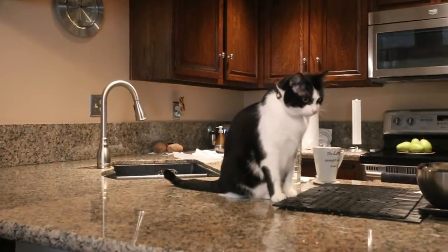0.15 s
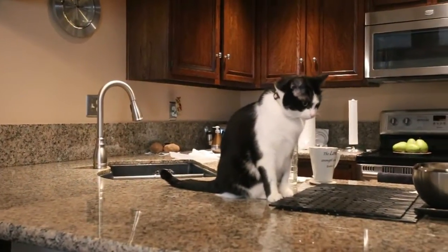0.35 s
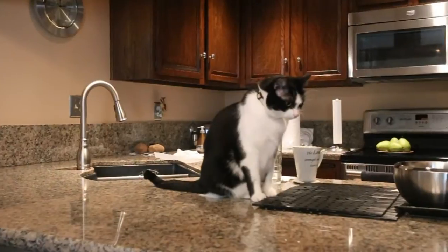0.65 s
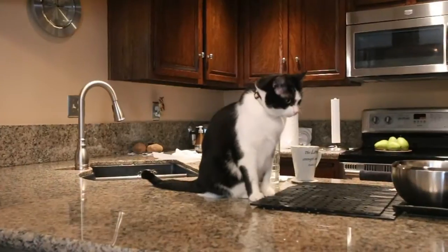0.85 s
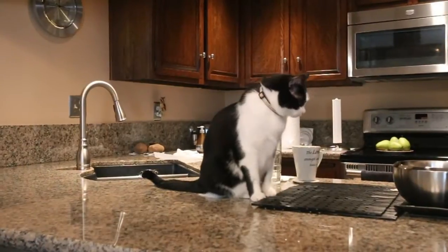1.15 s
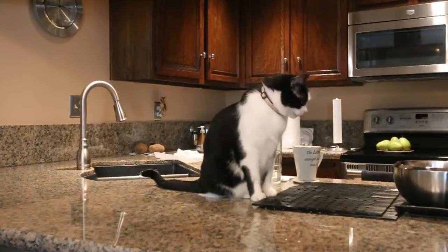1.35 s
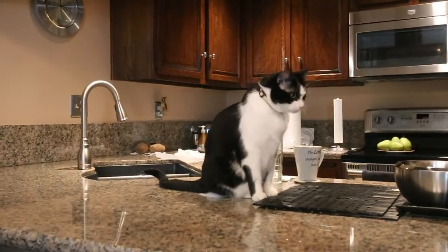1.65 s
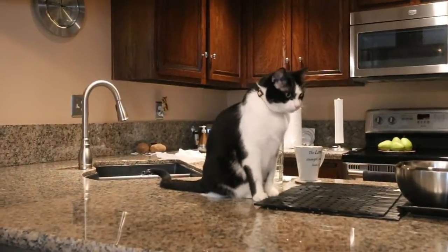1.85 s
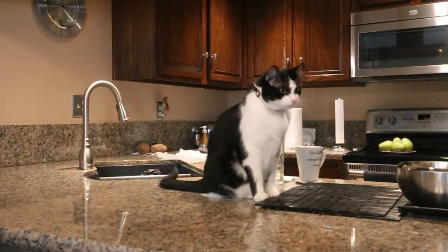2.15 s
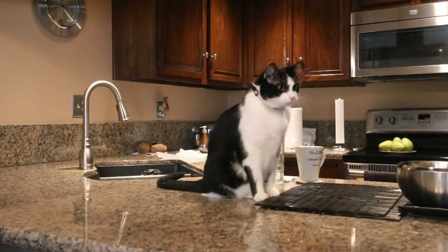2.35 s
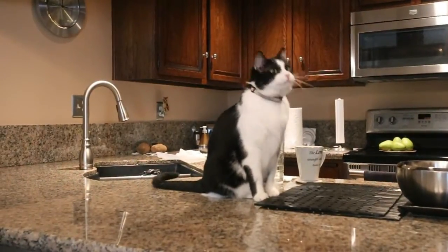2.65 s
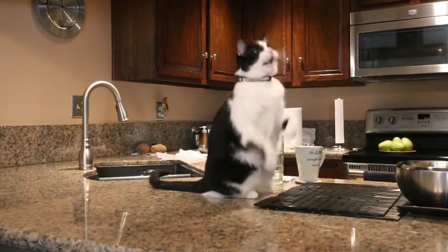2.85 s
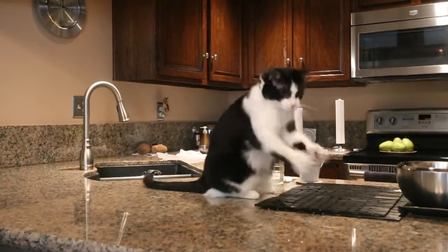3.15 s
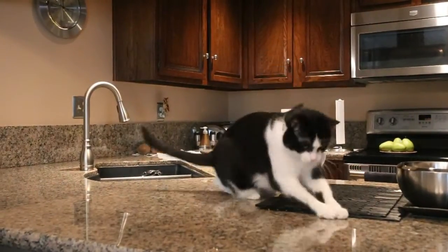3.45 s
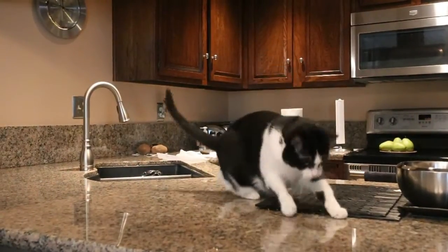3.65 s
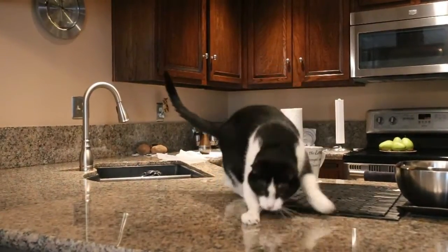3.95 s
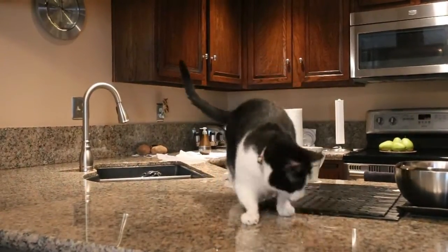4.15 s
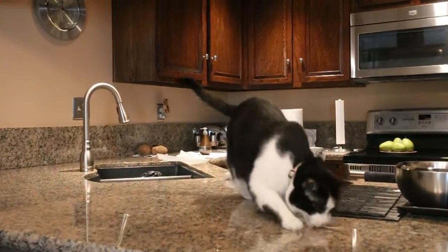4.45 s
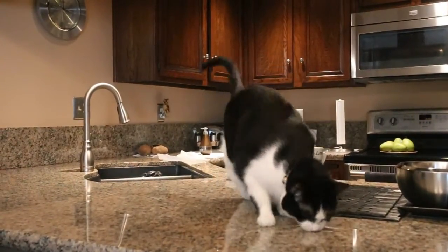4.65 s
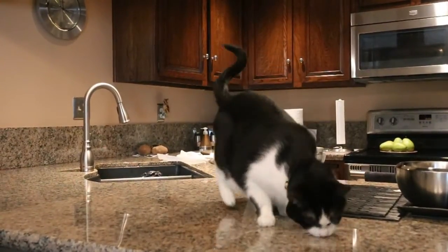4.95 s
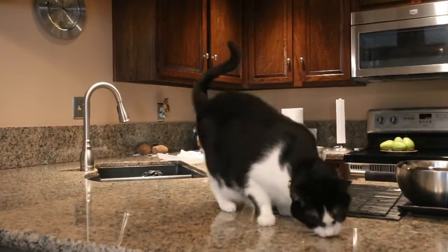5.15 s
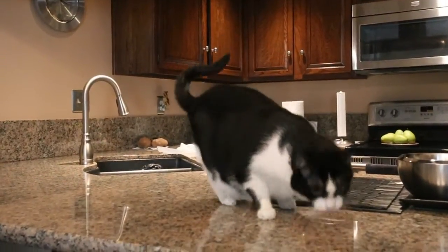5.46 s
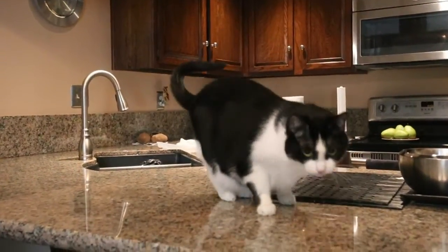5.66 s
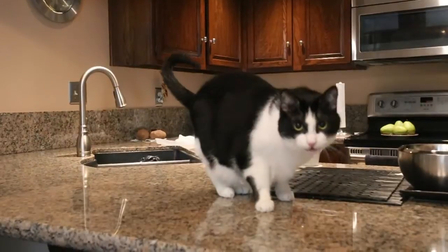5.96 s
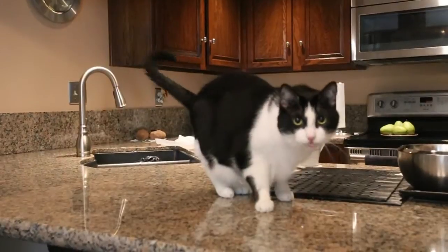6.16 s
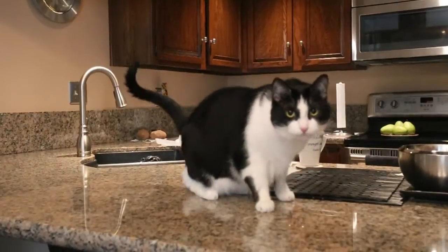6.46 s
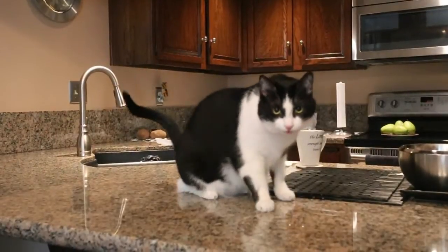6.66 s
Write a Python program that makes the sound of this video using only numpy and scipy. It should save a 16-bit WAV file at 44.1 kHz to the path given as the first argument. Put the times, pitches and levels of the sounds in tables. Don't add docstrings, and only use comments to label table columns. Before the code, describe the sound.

A quiet, hard-surfaced kitchen, with the microphone close to a stone counter. Soft bass-heavy room air and a faint wavering low hum run throughout, the hum swelling more from about 3.8 to 6.2 s. A distant wall clock ticks and tocks roughly every 0.65 s, softened by wall reflections. Until 2.6 s there are only very faint bumps and clicks. Fur rustles at 2.7-2.9 s with tiny bright claw skips. At 3.27 s a dry treat hits stone with a very loud, bright, brittle crack, briefly ringing, bouncing at 3.34 s. Light clicks scatter from 3.7 s; a second hard crack, clearly weaker, comes at 4.05 s. Knocks of teeth and claws cluster at 4.7 and 5.0 s, with dull paw thuds around 5.3 s. A short bump lands at 5.95 s, then sparse clicks and a small tag clink at 6.66 s.

```python
import sys
import numpy as np
from scipy import signal
from scipy.io import wavfile
from scipy.ndimage import uniform_filter1d

SR = 44100
rng = np.random.default_rng(int(sys.argv[2]) if len(sys.argv) > 2 else 0)


def transcribe(signal):
    frames = np.atleast_2d(signal).T
    limited = np.clip(frames, -1, 1)
    pcm = np.round(limited * 32767).astype(np.int16)
    wavfile.write(sys.argv[1], SR, pcm)


def natural_amplitude(level_db):
    exponent = np.asarray(level_db, float) / 20
    return 10 ** exponent


N = 300756


def evened(x):
    return x / np.sqrt(np.mean(x ** 2) + 1e-20)


def peaked(x):
    return x / np.max(abs(x))


def smoothed(x, size):
    once = uniform_filter1d(x, size=size)
    return evened(uniform_filter1d(once, size=size))


def read(points, hz):
    f, value = np.transpose(points)
    return np.interp(np.log(hz + 1), np.log(f + 1), value)


def add(mix, s, sound):
    part = mix[round(s * SR):][:len(sound)]
    part += sound[:len(part)]


def banded(x, hz=15700):
    lowpass = signal.firwin(401, hz, window=("kaiser", 8), fs=SR)
    return signal.oaconvolve(x, lowpass, "same")


def noise(tone, patchy_db):
    hz = np.fft.rfftfreq(1024, 1 / SR)
    a, b, patches = rng.standard_normal((N // 256 + 5, 513, 3)).T
    patches = uniform_filter1d(patches, size=12, axis=0)
    patches = evened(uniform_filter1d(patches, size=14, axis=1))
    z = (a + 1j * b) * natural_amplitude(read(tone, hz)[:, None] + patchy_db * patches)
    return evened(signal.istft(z, nperseg=1024, noverlap=768)[1][:N])


def ring(hz, t60, size=2048):
    t = np.arange(size) / SR
    return natural_amplitude(-60 * t / max(t60, .0005)) * np.sin(2 * np.pi * hz * t)


def contact(ms):
    t = np.arange(200) / SR
    edge = 3 * (t == 0)
    return (rng.standard_normal(len(t)) + edge) * np.exp(-t * 1000 / ms)


def blip(hz, cycles):
    u = np.arange(600) / SR * hz / cycles
    return peaked(u * np.exp(-2 * u) * np.sin(2 * np.pi * cycles * u))


def causal(tone):
    hz = abs(np.fft.fftfreq(2048, 1 / SR))
    log_gain = np.log(natural_amplitude(np.maximum(read(tone, hz), -100)))
    return np.fft.ifft(np.exp(np.conj(signal.hilbert(log_gain)))).real[:600]


def echoes(rows):
    taps = np.zeros(2000)
    for ms, db in rows:
        taps[round(ms * SR / 1000)] = natural_amplitude(db) * rng.choice([-1, 1])
    return taps


def ringing(s, db, hz, t60, room_db):
    tone = natural_amplitude(db) * ring(hz, t60, size=12000)
    return s, tone, natural_amplitude(room_db) * tone


def click(s, db, snap_hz, knock_hz, knock_db, room_db):
    touch = contact(0.61)
    snap = peaked(np.convolve(touch, blip(snap_hz, cycles=1.2)))
    knock = peaked(np.convolve(touch, blip(knock_hz, cycles=1.17)))
    lead = 200
    sound = banded(np.pad(natural_amplitude(db) * (snap + natural_amplitude(knock_db) * knock), (lead, 0)))
    return s - lead / SR, sound, natural_amplitude(room_db) * sound


# pitch_hz, t60_s
KITCHEN_DECAY = [(300, 0.29), (1300, 0.58), (3500, 0.52), (7000, 0.42), (11000, 0.32), (15500, 0.44)]


def room(gap_s, build_s):
    t = np.arange(SR * 2 // 3) / SR
    taps = np.zeros(len(t))
    at = np.arange(0, len(t) - 16, 16)
    taps[at + rng.integers(0, 16, len(at))] = rng.choice([-1., 1.], len(at))
    hz, frame_s, z = signal.stft(taps, SR, nperseg=256)
    decay = natural_amplitude(-60 * frame_s / read(KITCHEN_DECAY, hz)[:, None])
    tail = signal.istft(z * decay, SR, nperseg=256)[1][:len(t)]
    tail = tail * np.clip((t - gap_s) / build_s, 0, 1)
    return tail / np.linalg.norm(tail)


# pitch_hz, level_db (per Hz)
AIR_TONE = [(27, -36.5), (45, -7.5), (62, -6), (82, -6), (115, -0.5), (200, -6.5), (500, -10.5),
            (1000, -13.5), (2800, -18), (4200, -22), (5400, -28), (7500, -28.5), (11000, -26),
            (16000, -26.5)]


def air():
    return natural_amplitude(-57) * noise(AIR_TONE, patchy_db=0.55)


# middle_s, length_s, level_db
HUM_SWELLS = [(0.94, 0.22, -67), (1.856, .25, -69), (3.02, .2, -68), (3.823, 0.54, -61), (4.616, 0.13, -61),
              (5.188, 0.47, -57.5), (5.5, 0.083, -58.5), (5.951, 0.65, -59)]


def hum():
    pitch_hz, wander_hz = 113.5, 4.82
    level_db, waver_db, flutter_share = -73, 1.5, 0.21
    t = np.arange(N) / SR
    wander, waver, flutter = [smoothed(x, size)
                              for x, size in zip(rng.standard_normal((3, N)), (3000, 3000, 500))]
    level = natural_amplitude(level_db + waver_db * waver)
    for s, length, db in HUM_SWELLS:
        level += natural_amplitude(db) * np.exp(-(2 * (t - s) / length) ** 4)
    phase = 2 * np.pi * np.cumsum(pitch_hz + wander_hz * wander) / SR
    return level * (1 + flutter_share * flutter) * np.sin(phase)


CASE_HZ = [1600, 1710, 1790, 1900, 2030, 2390, 3260, 3420, 3510, 3595, 5030, 5180, 5290, 5910, 7550, 7850]
CASE_T60 = [.02, 0.09, .08, 0.028, 0.046, .07, 0.033, 0.04, 0.032, 0.064, .03, 0.039, 0.018, .02, 0.022,
            0.02]
# tick_db, tock_db
CASE_DB = [(-25, -39), (-10.5, -20), (-4, 0.5), (-2, -1), (-1.5, -9), (-3.5, 1.5), (-22, -27), (-9, -4.5),
           (-8, -4), (-7.5, -2), (-27.5, -15), (-22, 1), (-24, -19), (-28, -19), (-16, -11), (-20, -19)]
# tick_db, tock_db
BEAT_DB = (-54, -52.5)


def clock():
    first_tick_s, swing_s, tock_lag_s = .095, 1.3197, .6388
    out, heard = np.zeros(N), []
    body = SR // 20
    for side in range(2):
        path = room(0.00038, 0.0056)
        t = np.arange(len(path)) / SR
        path *= 1 + natural_amplitude(2) * np.exp(-(t / .04) ** 2)
        path[0] = natural_amplitude(-8)
        beat = 0
        for hz, t60, db in zip(CASE_HZ, CASE_T60, CASE_DB):
            mode = signal.fftconvolve(ring(hz, t60, size=3000), path)
            beat = beat + natural_amplitude(db[side]) * mode / np.std(mode[:body])
        heard.append(beat / np.std(beat[:body]))
    for s in np.arange(first_tick_s, N / SR, swing_s):
        for side in range(2):
            add(out, s + side * tock_lag_s, natural_amplitude(BEAT_DB[side]) * heard[side])
    return out


# start_s, level_db (peak), pitch_hz, t60_s
BUMPS = [(.212, -56, 5740, 0.0072), (.212, -56, 3100, .008), (0.391, -61, 324, .06),
         (1.15, -51, 825, 0.013), (1.15, -58.5, 3590, .03), (3.35, -44.5, 950, 0.009),
         (3.891, -55, 516, 0.074), (4.061, -52, 1760, 0.016), (5.091, -55, 303, 0.065),
         (5.15, -58, 1125, .06), (5.2, -58, 1176, 0.077), (5.276, -53, 109, 0.087), (5.29, -50, 213, .06),
         (5.278, -43, 390, 0.013), (5.331, -51.5, 330, 0.041), (5.399, -53, 271, 0.026),
         (5.944, -33.5, 2340, 0.0027)]


def bumps():
    return [ringing(*row, room_db=7) for row in BUMPS]


# start_s, level_db (of the snap), pitch_hz (of the knock)
KNOCKS = [(1.4344, -50, 1860), (3.7276, -45, 3110), (4.6826, -40.5, 4160), (5.0072, -42.5, 4200),
          (4.7228, -42.5, 2370), (4.74, -42.5, 2320), (5.0017, -43, 2260), (5.0056, -34.5, 2120),
          (5.0096, -38, 2050), (5.4058, -46.5, 1620), (5.9504, -46, 2410), (6.3831, -52, 1584)]


def knocks():
    return [click(s, db, 8100, hz, knock_db=5, room_db=-3.5) for s, db, hz in KNOCKS]


# start_s, level_db (peak), pitch_hz (of the snap)
SKIPS = [(1.4767, -49, 6320), (2.876, -42, 10580), (2.892, -44, 9150), (2.92, -47, 8010),
         (3.014, -38.5, 10600), (3.1018, -50, 9400), (3.7022, -43, 9300), (3.7645, -40, 10200),
         (3.77, -46, 9900), (3.822, -42.5, 9900), (4.176, -48, 8570), (4.2485, -38, 9700),
         (4.2595, -52, 11100), (4.3405, -42, 9800), (4.3664, -54, 10530), (4.9097, -45, 8190),
         (4.9624, -50, 8350), (5.1223, -44, 6800), (5.1215, -41, 10100), (5.1334, -54, 9550),
         (5.169, -46, 9400), (5.171, -47, 6500), (5.233, -42.5, 8400), (5.274, -49, 11400),
         (5.4332, -40.5, 12700), (5.4744, -53, 11300), (5.9916, -43, 9400)]


def skips():
    return [click(s, db, hz, 2000, knock_db=-13.5, room_db=-0.5) for s, db, hz in SKIPS]


# start_s, hold_s, level_db, release_db_per_s
RUB_STROKES = [(2.653, .02, -60, 100), (2.821, .09, -49, 148), (3.33, 0.021, -47, 68),
               (3.45, 0.19, -55, 42.5), (3.873, 0.016, -50, 80), (4.05, .12, -54.5, 75),
               (4.58, 0.089, -57.5, 103), (4.676, .01, -46.5, 99), (4.989, 0.014, -47, 153),
               (5.064, 0.13, -54, 102), (5.257, .01, -48, 172)]
# pitch_hz, level_db (per Hz)
RUB_TONE = [(88, -23), (150, -23.5), (373, -10), (570, -15), (799, -11.5), (981, -12.5), (1420, -13.5),
            (5000, -30.5), (6500, -40), (11000, -120)]


def rustle():
    rise_s = 0.016
    t, power = np.arange(N) / SR, np.zeros(N)
    for s, hold_s, db, fall_db in RUB_STROKES:
        late = np.maximum(t - s - rise_s - hold_s, 0)
        rise = np.clip((t - s) / rise_s, 0, 1)
        power += (rise * natural_amplitude(db - 6.5 - fall_db * late)) ** 2
    return np.sqrt(power) * noise(RUB_TONE, patchy_db=2.5)


# start_s, level_db (peak), pitch_hz, t60_s
RINGS = [(3.014, -53, 2490, .03), (3.103, -42, 4320, 0.0081), (4.432, -62, 8500, .01),
         (4.683, -35, 1980, 0.016), (5.006, -34, 2020, 0.02), (5.012, -45.5, 2024, 0.075),
         (5.008, -44, 1090, 0.042), (5.121, -51, 5880, 0.025), (5.121, -52, 9650, 0.036),
         (5.17, -48, 5620, .015), (5.17, -54, 7450, .012), (5.274, -42, 1430, 0.016),
         (5.278, -51, 860, 0.02), (5.609, -48.5, 2036, 0.023), (5.985, -45.5, 1605, 0.033),
         (6.384, -50, 4370, .01)]


def rings():
    return [ringing(*row, room_db=-3) for row in RINGS]


# start_s, level_db (peak), pitch_hz
STONE = [
    (3.2724, -32, 810),
    (4.0499, -32, 4900),
]


def stone():
    return [ringing(*row, t60=0.0034, room_db=-26) for row in STONE]


# start_s, level_db (peak), room_db
CRACKS = [
    (3.2733, 0, -2),
    (4.0503, -10, -10),
    (3.8811, -29.5, 5),
]
# pitch_hz, level_db (per Hz)
CRACK_TONES = [
    [(180, -67.5), (300, -41.5), (586, -38), (716, -39), (1000, -26), (1180, -23.5), (3690, -12),
     (5330, -6.5), (6300, -8), (6970, -1), (7960, -3.5), (9730, 3.5), (13600, -10), (16400, -25.5)],
    [(710, -38), (1200, -28), (1760, -24), (2660, -14), (3780, 9), (4310, 6), (5250, 4.5), (6750, -4),
     (7280, 0), (10900, 2), (15300, -14), (16400, -29)],
    [(1000, -33), (2000, -1.5), (3600, 2.5), (6000, -5), (9000, -0.5), (12000, 0), (16500, -7),
     (18000, -49)],
]
# later_ms, level_db
CRACK_REPEATS = [
    [(.3, -12), (.58, -10), (.9, -11), (1.3, -8.5), (1.9, -15.5), (2.4, -15)],
    [(.4, -2), (.8, -7), (1.6, -7), (2.3, -8)],
    [(.3, -10), (.8, 25), (9.5, -4)],
]


def cracks():
    hits = []
    for (s, db, room_db), tone, chatter in zip(CRACKS, CRACK_TONES, CRACK_REPEATS):
        repeats, crack = abs(echoes(chatter)), peaked(causal(tone))
        repeats[0] = 1
        whole = peaked(np.convolve(repeats, crack))
        hits.append((s, natural_amplitude(db) * whole, natural_amplitude(db + room_db) * crack))
    return hits


# start_s, level_db (peak), pitch_hz, t60_s
SHELL_SONG = [(3.2735, -25.5, 6840, 0.018), (3.2735, -23.5, 10000, 0.013), (3.2733, -31, 8440, 0.0055),
              (3.2735, -35, 5420, 0.01), (3.2735, -38, 11900, 0.0066), (4.0505, -34, 4520, .006),
              (4.0505, -43, 5350, 0.0032)]


def shell_song():
    return [ringing(*row, room_db=2.5) for row in SHELL_SONG]


# start_s, level_db (peak), pitch_hz (of the snap)
BOUNCES = [(3.338, -29, 7500), (3.3419, -24.5, 5000), (3.4774, -41, 5020), (3.713, -42, 4660),
           (4.021, -41, 9500), (4.0804, -31, 10100), (4.3004, -44.5, 9770), (4.3964, -47.5, 8540),
           (4.9416, -47.5, 8910), (4.9436, -44.5, 9500), (6.3977, -50, 8660), (6.6706, -46.5, 6500)]


def bounces():
    return [click(s, db, hz, 4050, knock_db=-2.5, room_db=-0.5) for s, db, hz in BOUNCES]


# start_s, level_db (peak)
TAG_STRIKES = [
    (5.708, -55.5),
    (5.80, -59),
    (5.92, -59),
    (6.656, -46),
]
# pitch_hz, level_db, t60_s
TAG_MODES = [(6210, -5, .012), (6450, -1.5, 0.017), (10200, -7, 0.014)]


def collar_tag():
    return [ringing(s, db + mode_db, hz, t60, room_db=4.5)
            for s, db in TAG_STRIKES for hz, mode_db, t60 in TAG_MODES]


# later_ms, level_db
WALLS = [(5.5, -23), (10.0, -24), (11.5, -18), (13.6, -19.5), (14.7, -14), (19.2, -19.5), (24, -23)]


def counter():
    hits = cracks() + skips() + bounces() + knocks()
    hits += bumps() + rings() + shell_song() + stone() + collar_tag()
    direct, sent = np.zeros(N), np.zeros((3, N))
    for k, (s, near, far) in enumerate(hits):
        add(direct, s, near)
        add(sent[k % len(sent)], s, far)
    for x in sent:
        paths = room(.001, 0.005)
        scatter = contact(1.5)[1:]
        add(paths, 0, natural_amplitude(7.5) * np.convolve(echoes(WALLS), scatter / np.linalg.norm(scatter)))
        direct += signal.oaconvolve(x, banded(paths))[:N]
    return direct


def scene():
    near = banded(counter(), hz=16600)
    soft = banded(clock() + rustle() + air())
    return (near + hum() + soft)[None]


def low_pass(x):
    return signal.sosfilt(signal.butter(12, 16500, fs=SR, output="sos"), x)


def record(dry):
    return low_pass(dry)


dry = scene()
out = record(dry)
transcribe(out)
```